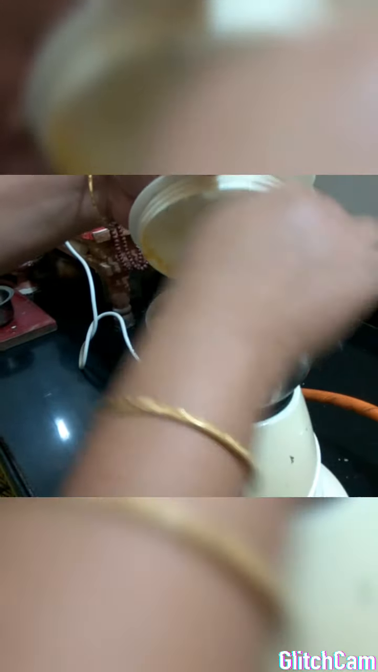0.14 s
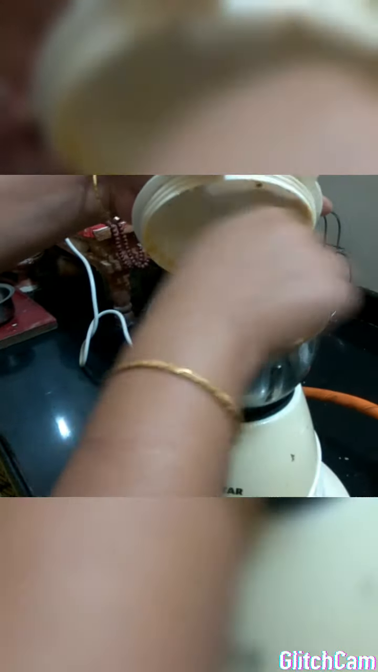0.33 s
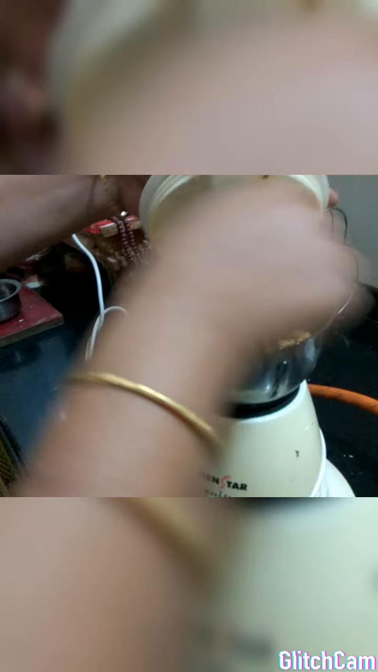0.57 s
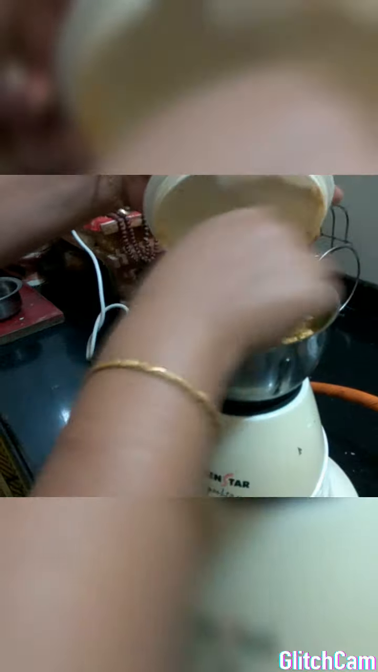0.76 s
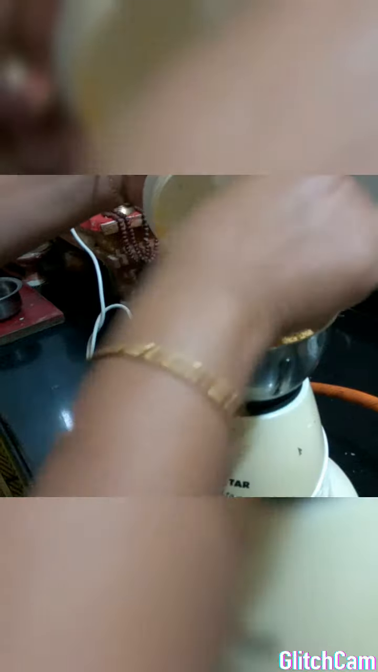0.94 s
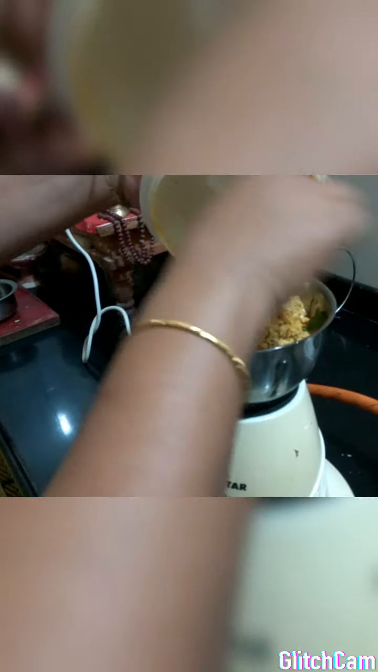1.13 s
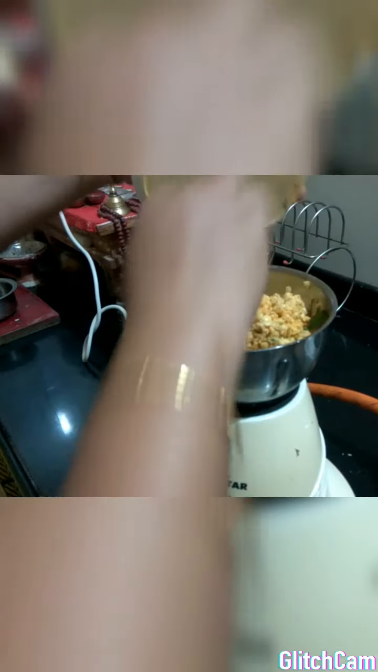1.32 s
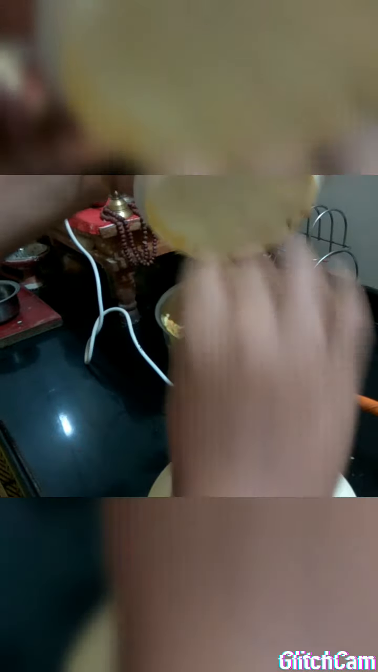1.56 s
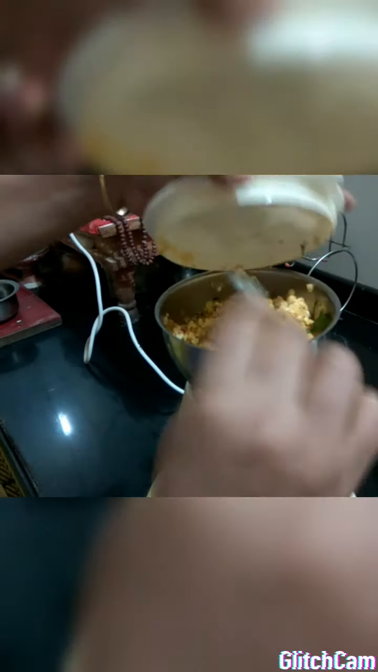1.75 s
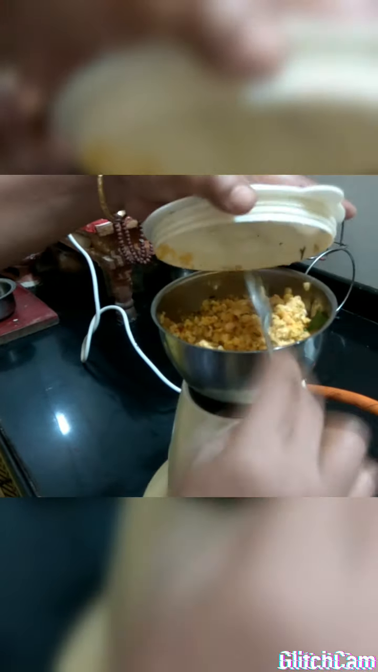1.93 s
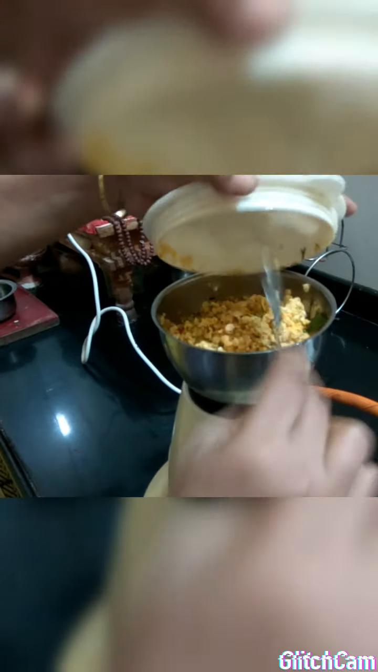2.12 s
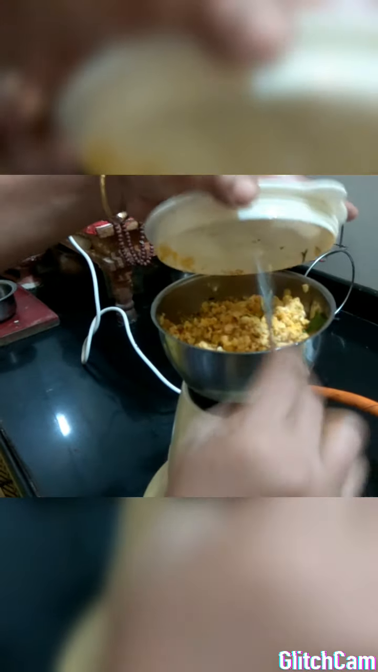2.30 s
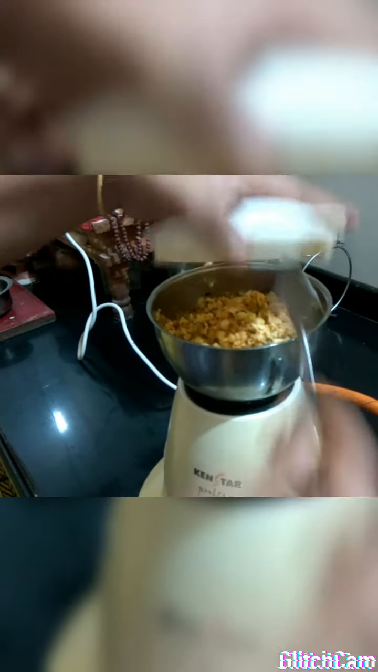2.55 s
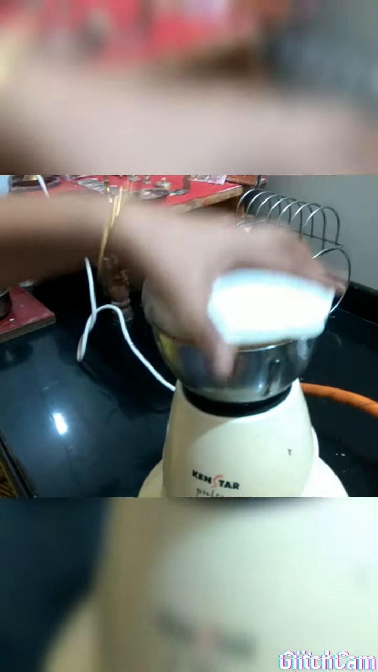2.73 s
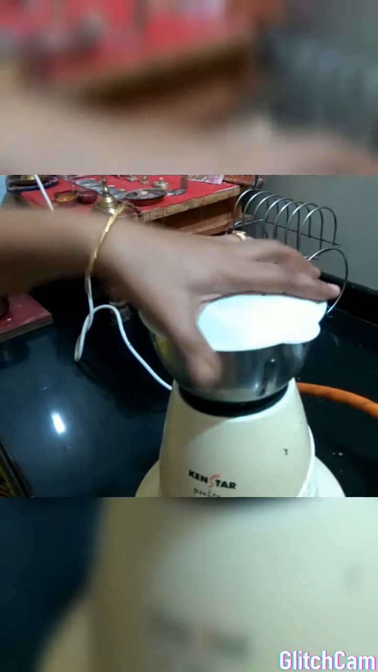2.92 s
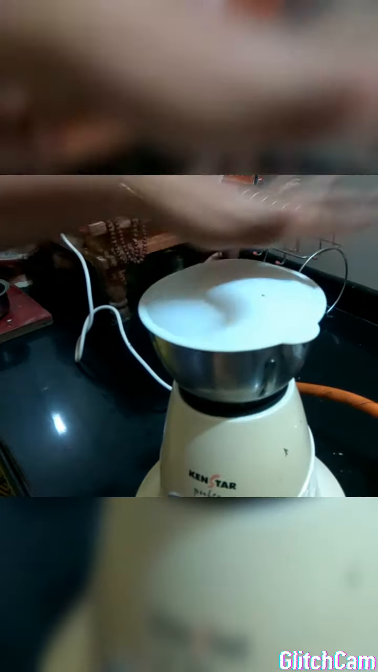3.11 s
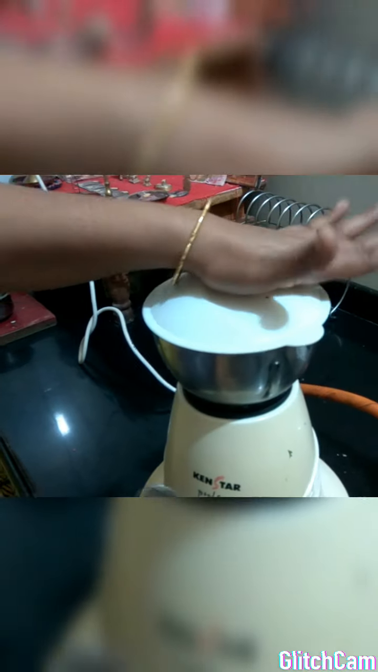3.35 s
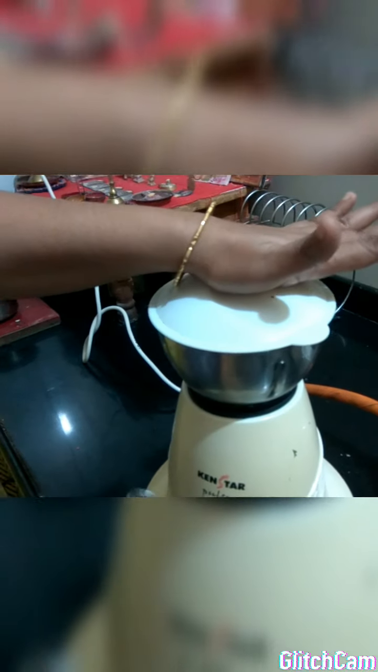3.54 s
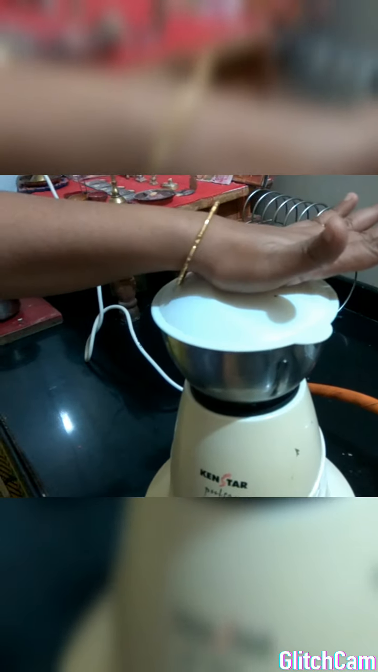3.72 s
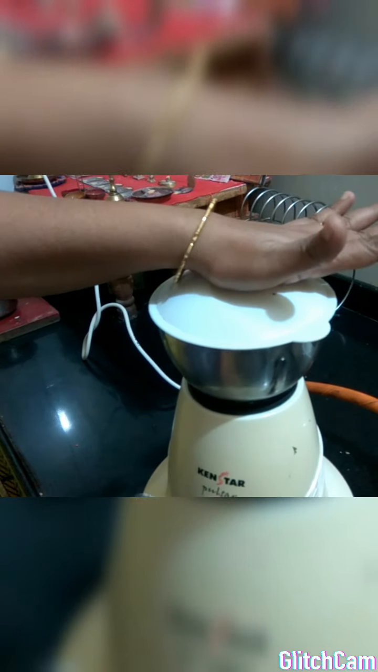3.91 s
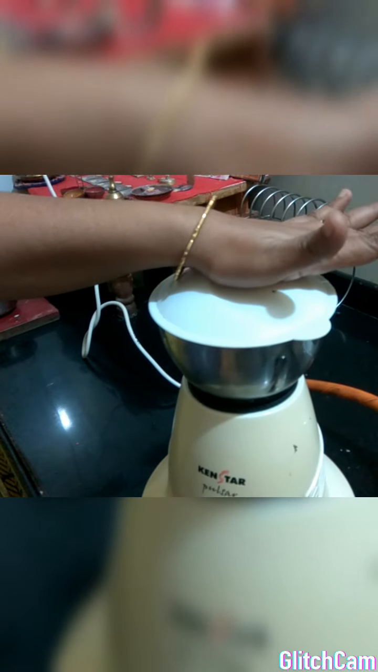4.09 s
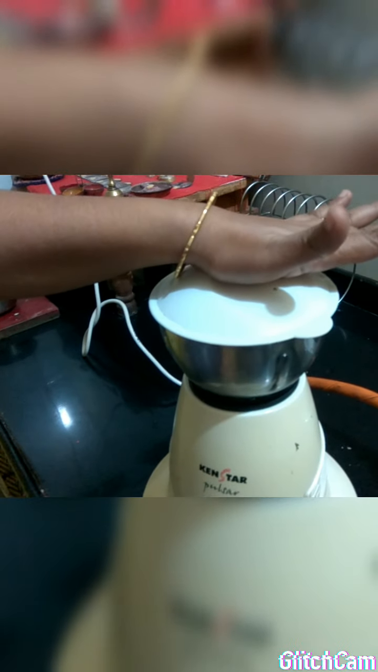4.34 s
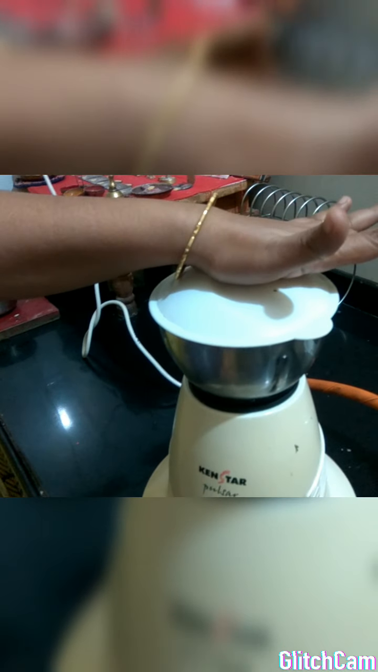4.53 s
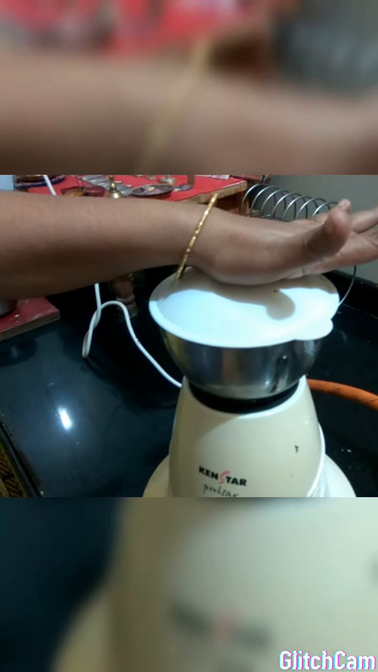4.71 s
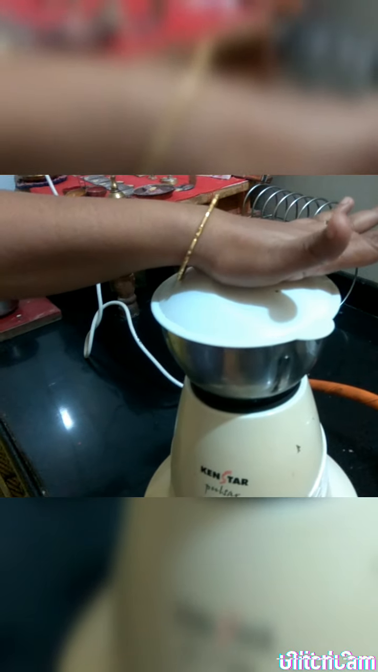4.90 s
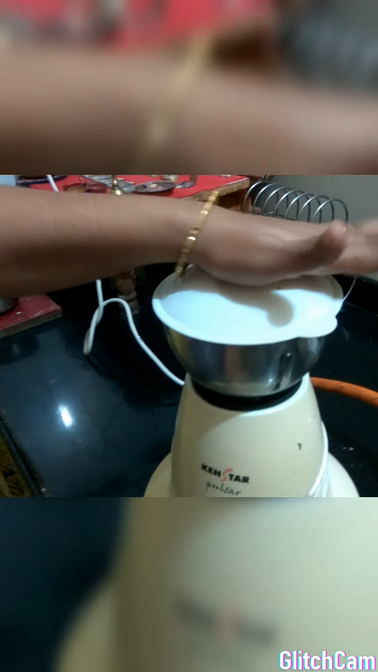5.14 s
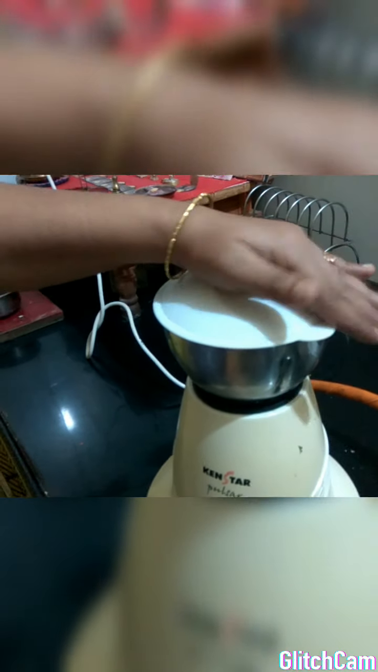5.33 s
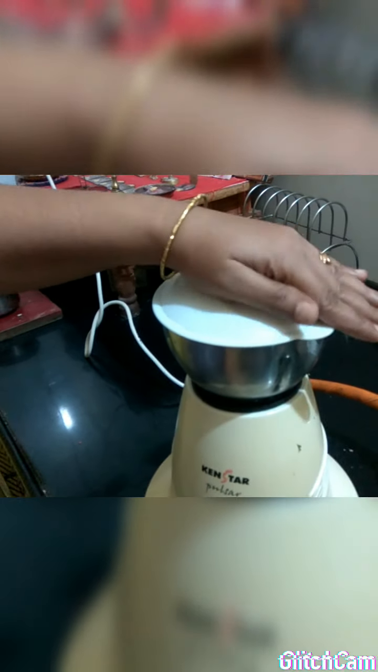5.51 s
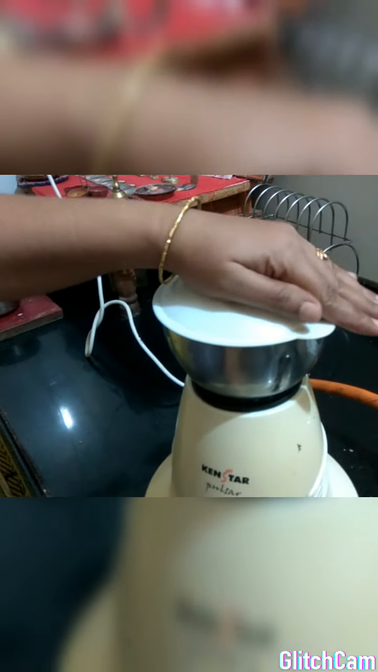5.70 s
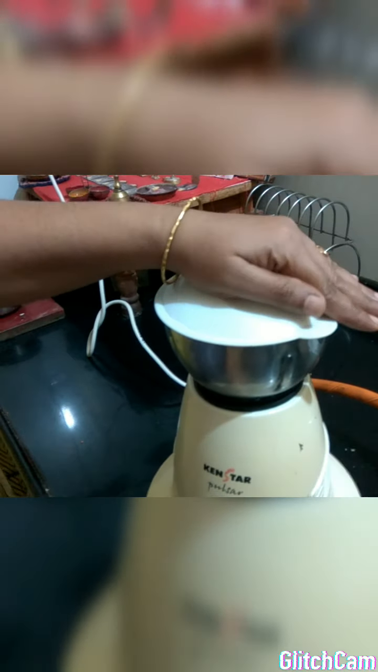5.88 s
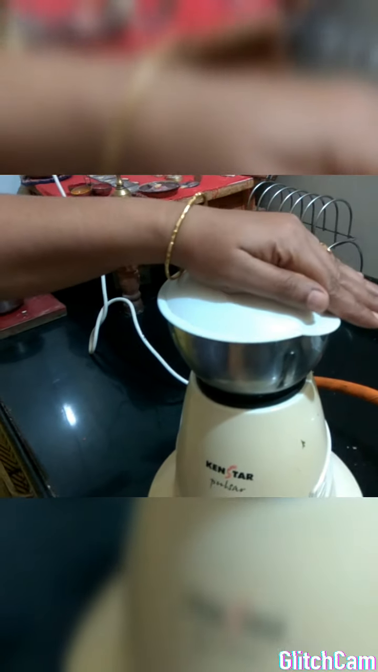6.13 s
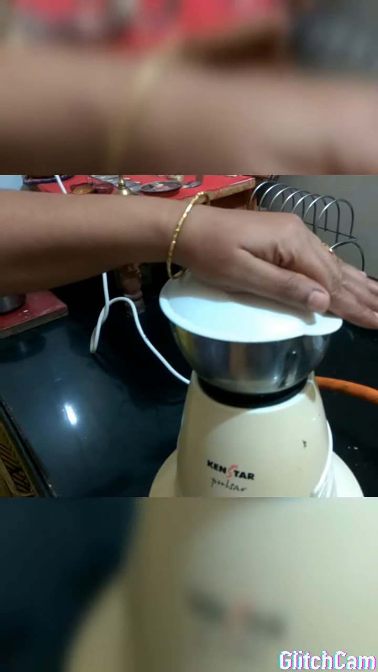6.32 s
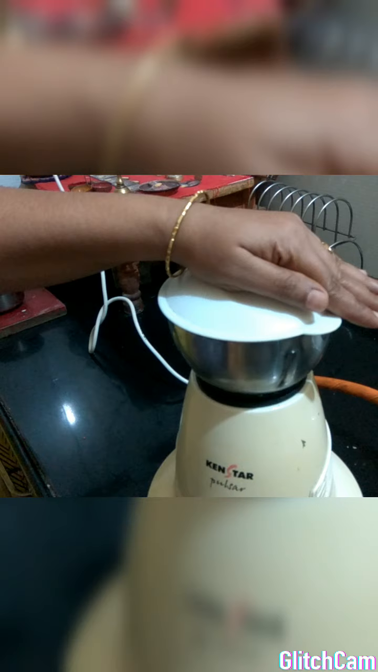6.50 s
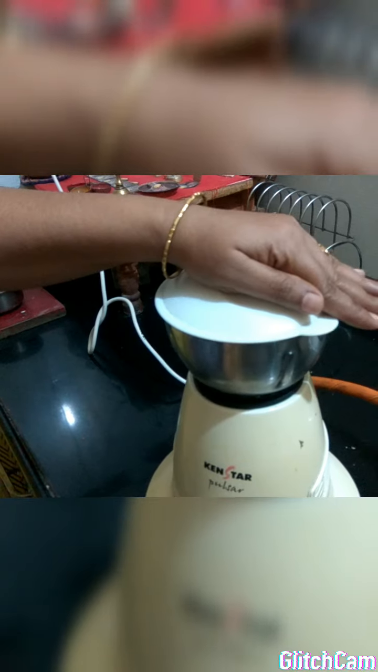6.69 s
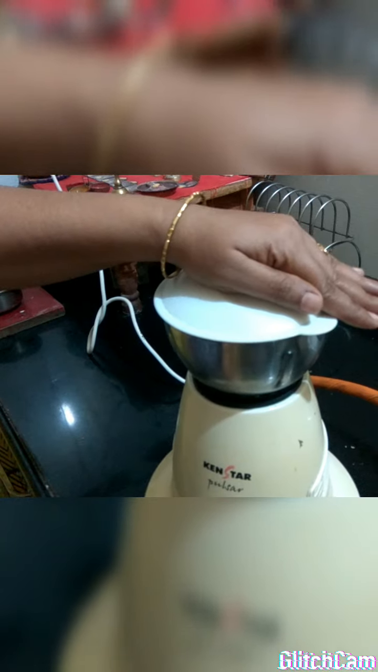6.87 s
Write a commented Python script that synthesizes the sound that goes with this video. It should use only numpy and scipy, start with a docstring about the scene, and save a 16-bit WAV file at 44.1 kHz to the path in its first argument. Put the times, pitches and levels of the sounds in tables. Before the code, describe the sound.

Close handheld stereo pickup in a hard-walled kitchen: scraping on a plastic rim, a bright spoon tick with lid clatter and brief lentil rustles, then three firm low plastic knocks. Soft lid contacts and a bangle clink lead to a quiet stretch of fridge hum, low drone and faint ticks. The pressed lid creaks, a switch snaps hard, and the grinder surges into a rough rattle.

```python
"""A quiet tiled kitchen, heard by a phone with two ports, over a humming fridge, a low drone and a wash of air.
A spoon scrapes, ticks and knocks a plastic lid clean while lentils tumble; the lid clatters onto a steel jar.
A bangle clinks, a knob ticks and the pressed lid creaks, then a switch snaps and the grinder buzzes,
shakes and rattles up to speed as lentils crack. Struck things are resonant modes rung by sharp, chattering
contacts; hums are sines; air and the room's tail are shaped noise."""
import sys
import numpy as np
from scipy import signal
from scipy.fft import rfft, irfft
from scipy.io import wavfile
from scipy.ndimage import uniform_filter1d

SR = 44100
rng = np.random.default_rng(int(sys.argv[2]) if len(sys.argv) > 2 else 0)


def log_audio(samples):
    """Write samples as a 16-bit WAV file to the path given in sys.argv[1]."""
    # one column per channel
    frames = np.atleast_2d(samples).T
    # limit to full scale, then quantise
    limited = np.clip(frames, -1, 1)
    pcm = np.round(limited * 32767).astype(np.int16)
    wavfile.write(sys.argv[1], SR, pcm)


N = 306495
T = np.arange(N) / SR  # s
MAINS_HZ = 49.875


def amp(db):
    """Decibels to linear gain."""
    return 10 ** (np.asarray(db, float) / 20)


def unit(x):
    """Scale a sound to an rms of one."""
    return x / np.sqrt(np.mean(x ** 2))


def sine(hz, db, t):
    """A steady tone with its level as rms."""
    return np.sqrt(2) * amp(db) * np.sin(2 * np.pi * hz * t)


def on_hz(table, size):
    """Read a (Hz, value) table at every bin of a transform, along log frequency."""
    hz, value = np.transpose(table)
    return np.interp(np.log(np.fft.rfftfreq(size, 1 / SR) + 1), np.log(hz), value)


def tilted(db, hz, tilt_db):
    """Gain of a mode after a brightness tilt in dB per octave about 1 kHz."""
    return amp(db + tilt_db * np.log2(hz / 1000))


def ring(x, modes, tilt_db=0):
    """Each mode is a two-pole resonance, with neighbours in opposite polarity."""
    out = 0
    for k, (hz, width, db) in enumerate(modes):
        mode = signal.lfilter(*signal.iirpeak(hz, hz / width, SR), x) * np.sqrt(SR / width)
        out = out + (-1) ** k * tilted(db, hz, tilt_db) * mode
    return out


def walk(rate):
    """A gentle wander: random levels held 1 / rate s and slewed."""
    k = int(SR / rate)
    held = np.repeat(rng.standard_normal(N // k + 1), k)
    return 0.49 * uniform_filter1d(held, k)[:N]


def grains(rate, spread_db):
    """Dense random knocks, rate per second, of uneven but bounded size."""
    timing, polarity, size = rng.random((3, N))
    size_db = spread_db * np.minimum(-np.log(1 - size), 3.5)
    return (timing < rate / SR) * np.sign(polarity - .5) * amp(size_db)


def blurred(modes, tilt_db, size):
    """One causal pulse whose power is the sum of widened modes, as the walls hear a thing from all sides."""
    spread = 1.6  # times each mode's own width
    f, power = np.fft.rfftfreq(size, 1 / SR) + 1, 0
    for hz, width, db in modes:
        peak = 1 / (1 + ((f ** 2 - hz ** 2) / (f * min(spread * width, hz))) ** 2)
        power = power + tilted(db, hz, tilt_db) ** 2 * peak / peak.mean() * size
    # folding the cepstrum forward puts the energy as early as it can be
    cepstrum = irfft(np.log(power) / 2, size)
    cepstrum[1:size // 2] *= 2
    cepstrum[size // 2 + 1:] = 0
    return irfft(np.exp(rfft(cepstrum)), size)


def blows(events, modes, left_lean_db, bright_db, chatter_ms, chatter, room_db, brighter_per_db=0):
    """A sharp contact and its short chatter ring the modes; returns left, right and what the walls hear.

    bright_db is the tilt per octave of a -30 dB blow; brighter_per_db adds to it for each dB above that."""
    size = 8192
    out, t = np.zeros((3, N + size)), np.arange(size) / SR
    for s, db in events:
        tilt_db = bright_db + brighter_per_db * (db + 30)
        push = chatter * rng.standard_normal(size) * np.exp(-t * 1000 / chatter_ms)
        push[0] = 1
        hit = 0
        for k, (hz, width, mode_db) in enumerate(modes):
            # every mode takes its share of the blow, whatever the chatter
            mode = unit(ring(push, [(hz, width, mode_db)]))
            hit = hit + (-1) ** k * tilted(mode_db, hz, tilt_db) * mode
        pulse = blurred(modes, tilt_db, size)
        heard = np.array([amp(left_lean_db / 2) * hit, amp(-left_lean_db / 2) * hit, amp(room_db) * pulse])
        start = int(s * SR)
        # sharp modes peak lower than the blurred pulse of equal energy
        out[:, start:start + size] += amp(db) * 2.51 * heard / np.abs(pulse).max()
    return out[:, :N]


# How alike diffuse sound is at the two ports. Each row: frequency in Hz, likeness from 0 to 1.
ALIKE = [(60, 0.95), (130, 0.89), (290, 0.78), (640, 0.49), (1400, 0.033), (3000, 0.0082)]


def diffuse(size):
    """Noise at two ports: alike in the bass, unrelated in the treble."""
    alike = on_hz(ALIKE, size)
    mid, side = rfft(rng.standard_normal((2, size)))
    mid, side = mid * np.sqrt((1 + alike) / 2), side * np.sqrt((1 - alike) / 2)
    return irfft(np.array([mid + side, mid - side]), size)


# Colour of the air. Each row: frequency in Hz, relative level in dB per Hz.
AIR = [(15, -46), (28, -26), (40, -16.5), (74, -7), (105, -14), (197, -10.5), (445, -16.5), (706, -26.5),
       (878, -25), (3510, -34), (5130, -32.5), (6380, -42.5), (8830, -35), (10400, -41), (14400, -36),
       (16500, -41.5)]


def air():
    """The wash of the house and the street: diffuse noise, coloured, its level gently wandering."""
    wash = irfft(rfft(diffuse(N)) * amp(on_hz(AIR, N)), N)
    return unit(wash) * amp(-58.5 + 0.69 * walk(0.825))


# Swells and fades of the low drone. Each row: time in seconds, level in dB.
DRONE_SWELLS = [(0, -63), (1.3, -58), (2, -57), (2.7, -54), (3.2, -61), (3.5, -55.5), (3.85, -67),
                (4.2, -63), (5, -76), (6.95, -82)]


def drone():
    """A low tone of wavering pitch swells and fades."""
    s, db = np.transpose(DRONE_SWELLS)
    hz = 77 + 3.37 * walk(8.6)
    turn = 2 * np.pi * np.cumsum(hz) / SR
    return np.sqrt(2) * amp(np.interp(T, s, db)) * np.sin(turn)


# Fridge hum locked to the mains. Each row: multiple of the mains, level in dB.
FRIDGE_MAINS = [(2, -54), (4, -100), (6, -70)]
# Fridge hum locked to the shaft. Each row: multiple of the shaft's turning rate, level in dB.
FRIDGE_SHAFT = [(2, -60.5), (3, -69.5), (9, -72.5), (11, -85.5)]


def fridge():
    """The compressor shaft slips behind the mains, so the hums beat about once a second."""
    shaft_hz, in_step_s = 49.402, 3.85
    t = T - in_step_s
    mains = sum(sine(k * MAINS_HZ, db, t) for k, db in FRIDGE_MAINS)
    shaft = sum(sine(k * shaft_hz, db, t) for k, db in FRIDGE_SHAFT)
    return mains + shaft


# Tail of the tiled room. Each row: band centre in Hz, time to fall 60 dB in seconds, level in dB.
KITCHEN = [(59, 0.19, 5), (125, 0.93, 4), (242, 0.25, 1.5), (500, 0.51, 0), (1000, 0.49, -3),
           (1930, 0.49, -5), (3700, 0.4, -3.5), (7440, 0.41, -8.5), (14900, 0.3, -4.5)]


def kitchen(x):
    """Tiled walls return a diffuse tail; each octave dies at its own pace."""
    size = SR
    t, tail = np.arange(size) / SR, 0
    for hz, t60, db in KITCHEN:
        edges = [hz / np.sqrt(2), hz * np.sqrt(2)]
        octave = signal.butter(2, edges, "band", fs=SR, output="sos")
        band = signal.sosfilt(octave, diffuse(size))
        tail = tail + amp(db - 60 * t / t60) * band * np.sqrt(2 * np.log(1000) / (t60 * SR))
    tail = tail * np.clip((t - .004) / 0.0011, 0, 1)  # the first walls are a few ms away
    return signal.fftconvolve(x[None], tail, axes=1)[:, :N]


# Contacts that ring the rim: a clatter already ringing as the scene opens, then a spoon scrape. Each row: start
# in seconds, level in dB.
RIM_CONTACTS = [(0.0, -24.5), (0.021, -28), (1.322, -22.5)]
# Modes of the rim. Each row: frequency in Hz, width in Hz, level in dB.
RIM = [(830, 41, 5.5), (1850, 179.5, 3), (2720, 920, 4), (3560, 340, 4.5), (4260, 450, 3.5),
       (7000, 1496, 2.5), (10000, 8600, 0.5), (14600, 3000, -3)]


def rim_contacts():
    """Long, strong chatter rings the rim."""
    return blows(RIM_CONTACTS, RIM, left_lean_db=0.66, bright_db=1,
                 chatter_ms=16, chatter=0.88, room_db=1.4)


# Spoon or lid dragged over lentils and rim.
# Each row: loudest moment in seconds, level in dB, brightness in dB per octave.
STIRS = [(.785, -56.5, 2.5), (1.236, -46, 5), (1.265, -54, 18), (1.677, -45, -4), (2.755, -54.5, -3.5)]
# Modes of the steel jar. Each row: frequency in Hz, width in Hz, level in dB.
JAR = [(283, 92, 3.5), (720, 230, -4.5), (850, 118, 1.5), (1130, 400, 0.5), (1703, 186, 3),
       (2260, 390, -1.5), (2856, 166, -2.5), (3470, 500, -9), (4420, 2000, -8), (6620, 5200, -28),
       (9900, 7900, -28), (14000, 16000, -27.5)]


def stirring():
    """Lentils tumble against the jar: a quick swell, a slower fade."""
    rise_db_s, fall_db_s = 600, 302
    lentils, out = grains(900., 2.6), 0
    for s, db, tilt_db in STIRS:
        fade_db = np.maximum(rise_db_s * (s - T), fall_db_s * (T - s))
        out = out + amp(db - fade_db) * unit(ring(lentils, JAR, tilt_db))
    return out


# Spoon ticks. Each row: start in seconds, level in dB.
SPOON_TICKS = [(1.097, -19)]
# Modes of the spoon. Each row: frequency in Hz, width in Hz, level in dB.
SPOON = [(233, 53, -3.5), (890, 100, -5.5), (1690, 120, -7), (3180, 200, -0.5), (4300, 2300, -7),
         (5350, 580, 2.5), (6440, 620, -1), (10500, 2700, -5), (14500, 3000, -4.5)]


def spoon_ticks():
    """A short contact rings the spoon itself."""
    return blows(SPOON_TICKS, SPOON, left_lean_db=-3.9, bright_db=.1,
                 chatter_ms=2.3, chatter=0.29, room_db=-0.72)


# Lid clatter. Each row: start in seconds, level in dB.
LID_CLATTER = [(1.217, -26.5), (1.234, -39), (1.243, -34.5), (1.255, -42), (2.562, -42.5), (2.806, -42.5),
               (2.839, -30.5), (2.917, -34.5), (2.938, -36.5), (2.948, -39.5)]
# Modes of the lid on the jar. Each row: frequency in Hz, width in Hz, level in dB.
LID_ON_JAR = [(165, 350, -4), (316, 65, 0), (560, 230, -4.5), (900, 93, 0.5), (1660, 77, -14),
              (2500, 230, -17)]


def lid_clatter():
    """Clean contacts with little chatter ring the lid against the jar."""
    return blows(LID_CLATTER, LID_ON_JAR, left_lean_db=-2.1, bright_db=0.76,
                 chatter_ms=3.2, chatter=0.077, room_db=-3.7)


# Jar taps. Each row: start in seconds, level in dB.
JAR_TAPS = [(1.334, -36)]


def jar_taps():
    """A faint, short contact rings the jar."""
    return blows(JAR_TAPS, JAR, left_lean_db=-1.5, bright_db=1.2,
                 chatter_ms=2, chatter=0.13, room_db=-1.1)


# Spoon knocks. Each row: start in seconds, level in dB.
SPOON_KNOCKS = [(1.897, -34), (2.026, -15), (2.202, -13.5), (2.36, -11)]
# Modes of the lid held in the hand. Each row: frequency in Hz, width in Hz, level in dB.
LID_HELD = [(98, 13, -5.5), (230, 42, -13), (430, 48, 3), (630, 193, -4.5), (778, 58, -2.5),
            (1090, 450, -12.5), (1566, 25, -15.5), (2018, 78, -13.5), (2540, 240, -15.5), (3550, 3000, -30),
            (5030, 390, -54), (7000, 2600, -41), (9150, 1400, -58), (14040, 3400, -25.5)]


def spoon_knocks():
    """The spoon strikes the hand-held plastic lid, which rings low."""
    return blows(SPOON_KNOCKS, LID_HELD, left_lean_db=-4, bright_db=2.67,
                 chatter_ms=4.2, chatter=0.28, room_db=-2.6)


# Bangle clinks. Each row: start in seconds, level in dB.
BANGLE_CLINKS = [(3.336, -20.5), (3.424, -31), (3.473, -49), (3.498, -47)]
# Modes of the bangle. Each row: frequency in Hz, width in Hz, level in dB.
BANGLE = [(354, 43, 0.5), (936, 430, -3.5), (1490, 390, -1), (2725, 110, 3.5), (3570, 150, -1.5),
          (4330, 210, -5), (5540, 760, -3.5), (8200, 710, -11), (11800, 1100, -16), (14500, 2000, -34)]


def bangle_clinks():
    """Very brief contacts ring the bangle."""
    return blows(BANGLE_CLINKS, BANGLE, left_lean_db=-4, bright_db=.1,
                 chatter_ms=1.2, chatter=0.31, room_db=-2)


# Knob ticks. Each row: start in seconds, level in dB.
KNOB_TICKS = [(4.843, -45.5), (5.149, -50.5), (5.786, -38), (5.907, -52), (6.055, -45.5), (6.345, -32),
              (6.494, -45.5)]
# Modes of the knob. Each row: frequency in Hz, width in Hz, level in dB.
KNOB = [(600, 360, -25), (990, 430, -5), (2280, 300, -1.5), (2710, 48, -9.5), (3190, 350, -5.5),
        (4570, 230, -7.5), (5420, 240, -13), (8800, 180, -28)]


def knob_ticks():
    """Small contacts ring the knob, brighter when harder."""
    return blows(KNOB_TICKS, KNOB, left_lean_db=-1.5, bright_db=2.1, brighter_per_db=0.41,
                 chatter_ms=5.2, chatter=0.16, room_db=-2.7)


# Lid creaks. Each row: start in seconds, level in dB.
LID_CREAKS = [(5.413, -22), (5.513, -34)]
# Modes of the pressed lid. Each row: frequency in Hz, width in Hz, level in dB.
LID_PRESSED = [(352, 60, -2), (667, 250, -27), (915, 120, -2), (1490, 330, -4), (2080, 240, -2),
               (3000, 520, -6.5), (4140, 1000, 1), (5940, 4800, -0.5), (8800, 5400, -4), (12800, 3000, -25)]


def lid_creaks():
    """Strong chatter rings the broad modes of the pressed lid."""
    return blows(LID_CREAKS, LID_PRESSED, left_lean_db=-2.7, bright_db=.1,
                 chatter_ms=2.8, chatter=0.65, room_db=-3.6)


# Switch snap. Each row: start in seconds, level in dB.
SWITCH_SNAP = [(6.652, -3), (6.664, -28)]
# Modes of the switch. Each row: frequency in Hz, width in Hz, level in dB.
SWITCH = [(1030, 330, -17), (2200, 250, -6), (2660, 28, -10.5), (3370, 230, -4.5), (4740, 430, -3),
          (6260, 1300, -8), (8300, 1050, -7), (11000, 1300, -7.5), (14900, 1500, -7.5)]


def switch_snap():
    """A hard contact and a fainter one ring the switch."""
    return blows(SWITCH_SNAP, SWITCH, left_lean_db=.1, bright_db=-.9,
                 chatter_ms=9.2, chatter=0.12, room_db=-0.26)


# Lentil cracks. Each row: start in seconds, level in dB.
LENTIL_CRACKS = [(6.848, -10), (6.885, -24)]


def lentil_cracks():
    """Single sharp cracks ring the jar above the rattle."""
    return blows(LENTIL_CRACKS, JAR, left_lean_db=1.1, bright_db=1.5,
                 chatter_ms=1.2, chatter=0.13, room_db=-0.94)


ON_S = np.maximum(T - 6.655, 0)  # seconds since the grinder was switched on


def run_up(level_db, rise_s, drift_db_per_s):
    """A grinder layer rises from the switch-on and then drifts in level."""
    return amp(level_db + drift_db_per_s * ON_S) * (1 - np.exp(-(ON_S / rise_s) ** 2))


def bump(at_s, width_s):
    """A smooth hump that reaches one at its centre."""
    return np.exp(-((T - at_s) / width_s) ** 2)


# Harmonics of the motor. Each row: multiple of twice the mains, relative level in dB.
BUZZ = [(1, 4.5), (2, -8), (3, -11), (4, -3.5)]


def motor_buzz():
    """Torque pulses at twice the mains make a harmonic buzz."""
    buzz = sum(sine(k * 2 * MAINS_HZ, db, T) for k, db in BUZZ)
    return run_up(-27, 0.066, -43) * buzz


# Modes of the grinder's base. Each row: frequency in Hz, width in Hz, level in dB.
BASE = [(160, 150, -10), (264, 150, -6.5), (348.6, 52, -3.5), (445, 104, 0.5), (501, 60, -2.5)]


def base_shake(lentils, surge_db):
    """Throbbing knocks ring the base, which shudders hardest while the motor gathers speed."""
    shudder_db = 5.5 * bump(6.715, 0.026)
    swell = amp(0.92 * surge_db + shudder_db)
    return run_up(-33.5, 0.0095, 0.) * swell * unit(ring(lentils, BASE))


def jar_rattle(lentils, surge_db):
    """Lentils strike the jar, brighter as the blades speed up; each port faces its own side of it."""
    tilt_db = -0.5 + 14 * ON_S  # per octave
    sides = [lentils + 1.85 * grains(2500., 2.6) for _ in range(2)]
    left, right = (ring(x, JAR, tilt_db) / np.std(ring(x, JAR)) for x in sides)
    heard = np.array([amp(-3.0) * left, right, (left + right) / 2])
    return run_up(-28, 0.014, 15.5) * amp(surge_db) * heard


# The blades bite into the heap. Each row: loudest moment in seconds, lift in dB.
SURGES = [(6.726, 4.5), (6.772, 2), (6.853, 4.5), (6.909, 3.5)]


def grinder():
    """Torque pulses throb the lentil knocks on jar and base; returns their left, right and wall sound."""
    surge_db = sum(db * bump(s, 0.013) for s, db in SURGES)
    throb = 1 + 0.41 * np.cos(4 * np.pi * MAINS_HZ * T)
    lentils = grains(2500., 3.45) * throb
    return jar_rattle(lentils, surge_db) + base_shake(lentils, surge_db)


def scene():
    """Near sounds reach the right port first, then the room answers."""
    near = rim_contacts() + stirring() + spoon_ticks() + lid_clatter() + jar_taps() + spoon_knocks()
    near = near + bangle_clinks() + knob_ticks() + lid_creaks() + switch_snap()
    near = near + lentil_cracks() + grinder()
    left_lag = 14  # samples
    direct = np.array([np.pad(near[0], (left_lag, 0))[:N], near[1]])
    return direct + kitchen(near[2]) + motor_buzz() + fridge() + drone() + air()


# Thin tones of the electronics. Each row: frequency in Hz, level in dB before flicker and port balance.
WHINE = [(4000, -76), (5000, -79), (7000, -84), (8000, -79), (9000, -80), (11000, -88), (12000, -86),
         (13000, -88), (14000, -77)]
# Spans in which the thin tones are silent. Each row: from in seconds, to in seconds.
WHINE_SILENT_SPANS = [(.35, .57), (3.0, 3.15), (3.95, 4.1), (4.95, 5.06), (5.72, 6.02)]


def electronic_whine():
    """High thin tones, each flickering by itself, with shared silent spans."""
    whine = 0
    for hz, db in WHINE:
        flicker_db = 4 * np.tanh(3 * walk(60.))
        whine = whine + sine(hz, db + flicker_db, T)
    for start, stop in WHINE_SILENT_SPANS:
        whine = whine * np.clip(np.maximum(start - T, T - stop) / .01, 0, 1)  # 10 ms fades
    return whine


# Colour of the two ports. Each row: frequency in Hz, left minus right in dB.
PORTS = [(60, 3), (110, 1), (200, -1), (380, -3), (700, -4), (1000, -6), (1550, -7.5), (2400, -3.5),
         (4400, -5.5), (8100, -9), (15000, -4)]


def record(dry):
    """The two ports colour the sound apart; the electronics add hiss and a whine, mostly on the right."""
    lean = amp(np.array([[.5], [-.5]]) * on_hz(PORTS, N))
    whine = amp(np.array([[-11.], [.1]])) * electronic_whine()  # left, right
    hiss = amp(-80.) * rng.standard_normal((2, N))
    wet = irfft(rfft(dry) * lean, N) + whine + hiss
    top_hz = 15800
    return signal.sosfilt(signal.ellip(10, .2, 70, top_hz, fs=SR, output="sos"), wet)


dry = scene()
out = record(dry)
log_audio(out)
```